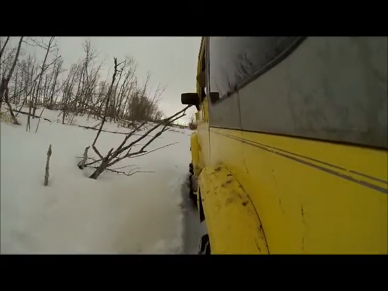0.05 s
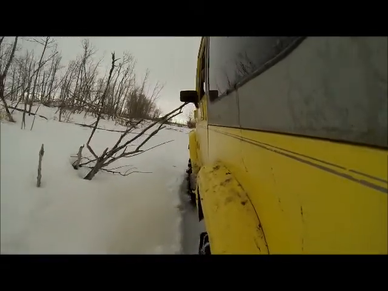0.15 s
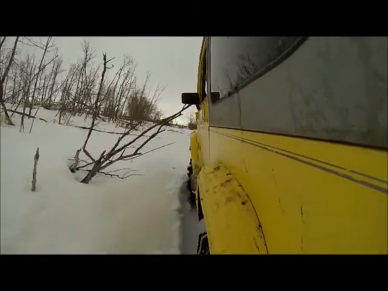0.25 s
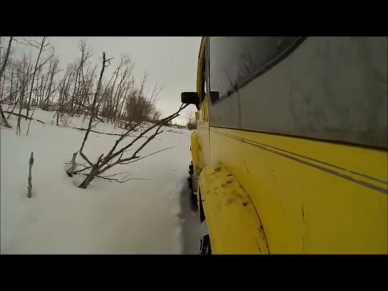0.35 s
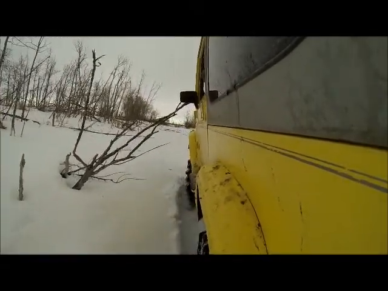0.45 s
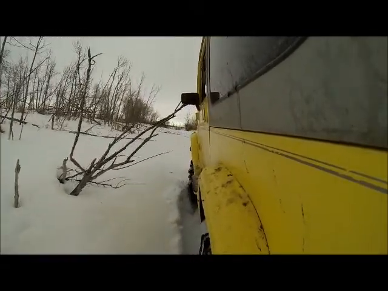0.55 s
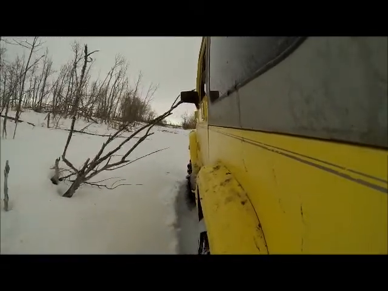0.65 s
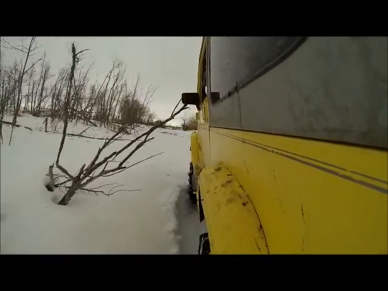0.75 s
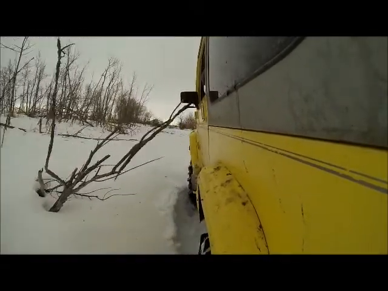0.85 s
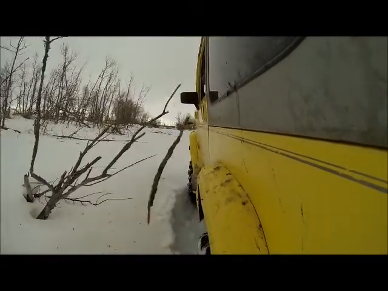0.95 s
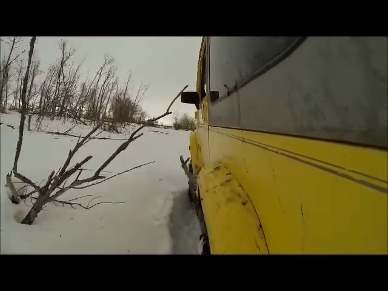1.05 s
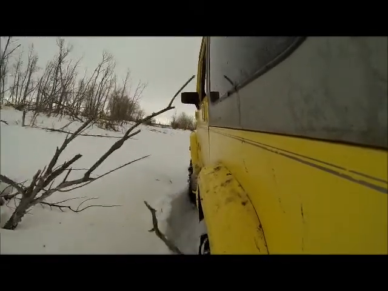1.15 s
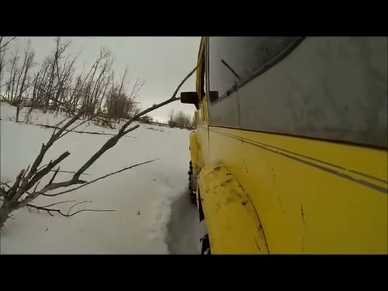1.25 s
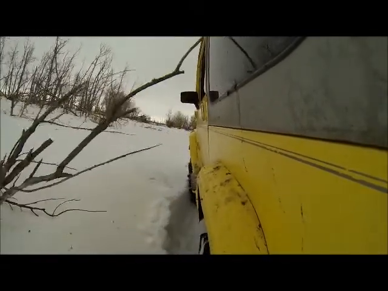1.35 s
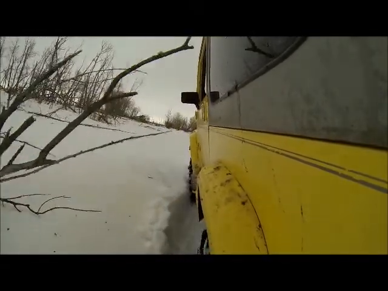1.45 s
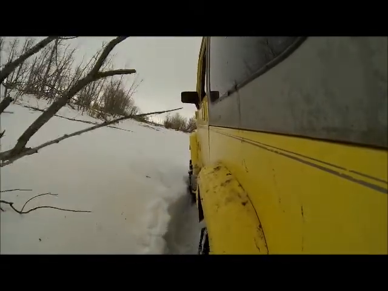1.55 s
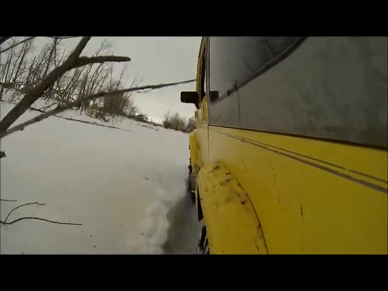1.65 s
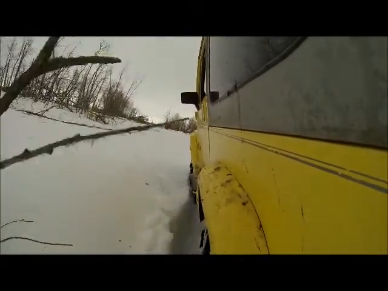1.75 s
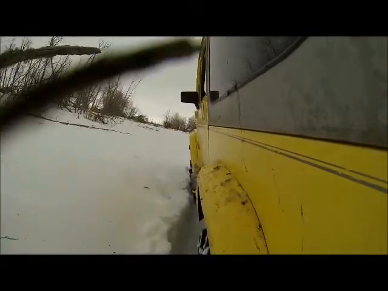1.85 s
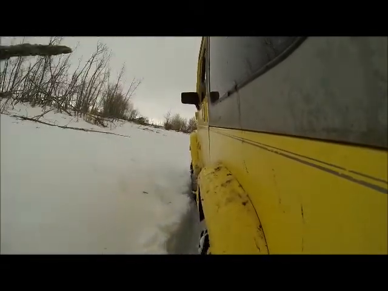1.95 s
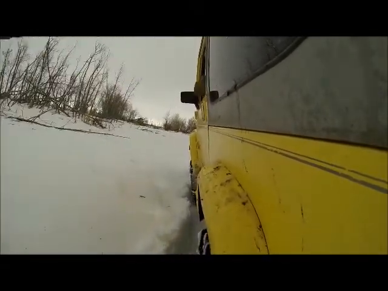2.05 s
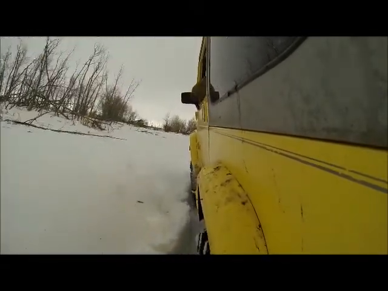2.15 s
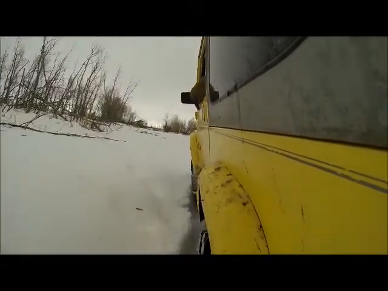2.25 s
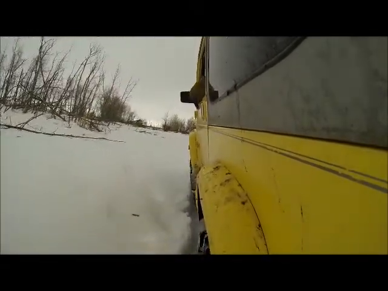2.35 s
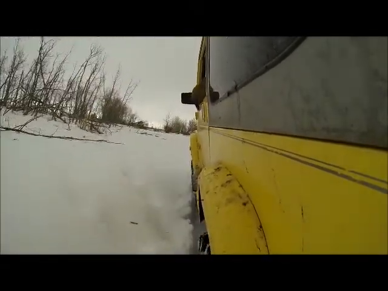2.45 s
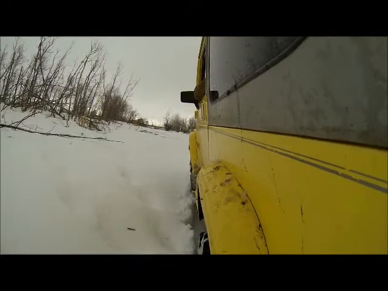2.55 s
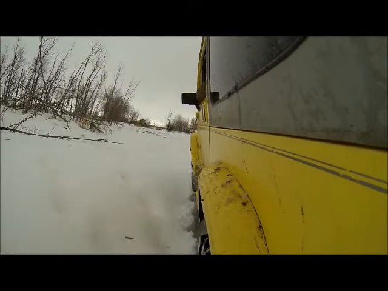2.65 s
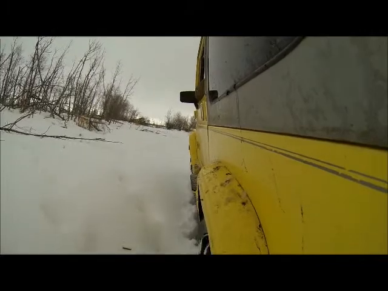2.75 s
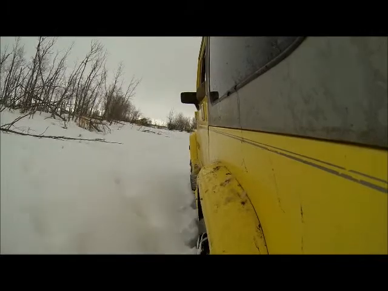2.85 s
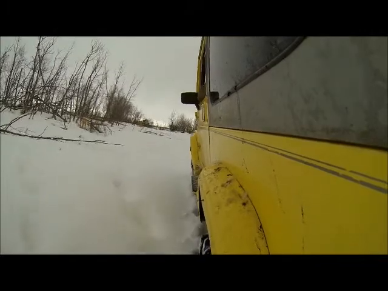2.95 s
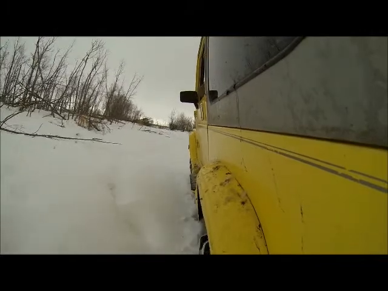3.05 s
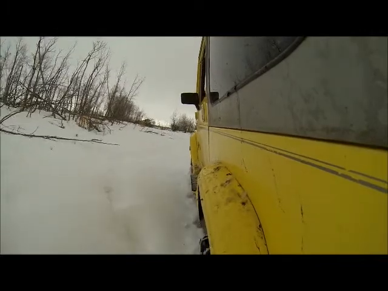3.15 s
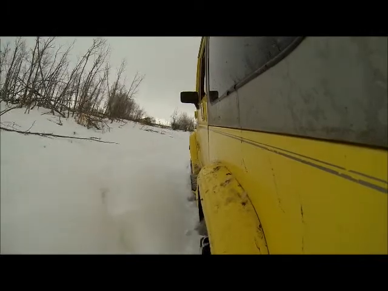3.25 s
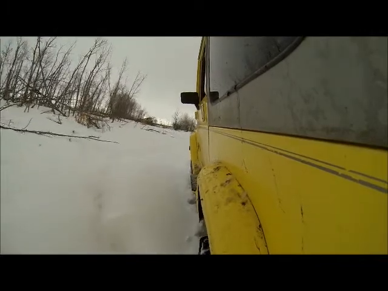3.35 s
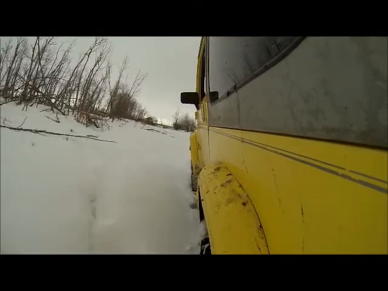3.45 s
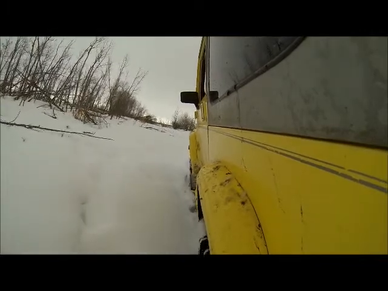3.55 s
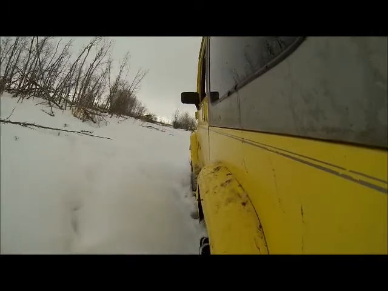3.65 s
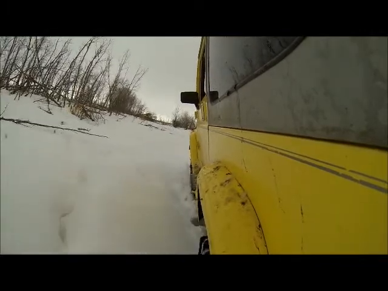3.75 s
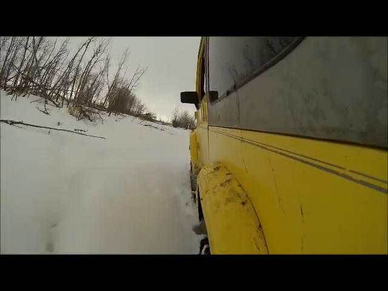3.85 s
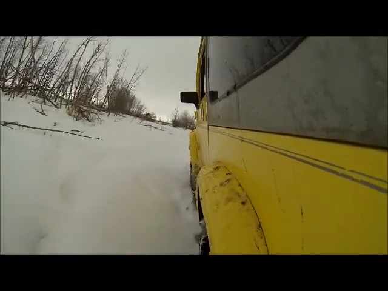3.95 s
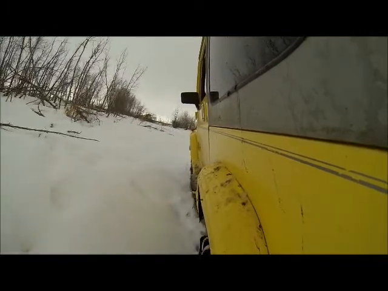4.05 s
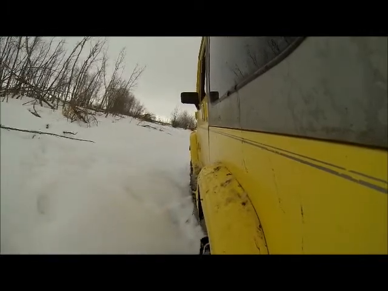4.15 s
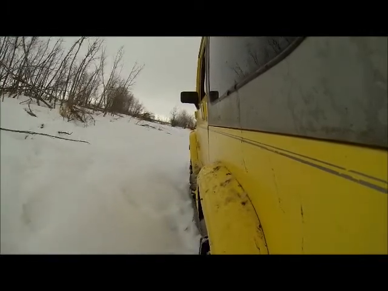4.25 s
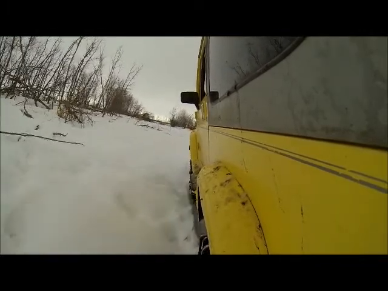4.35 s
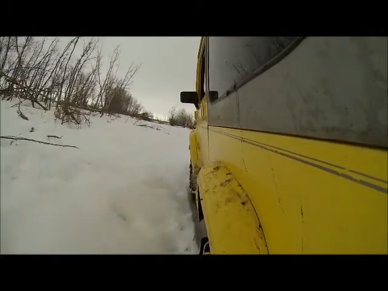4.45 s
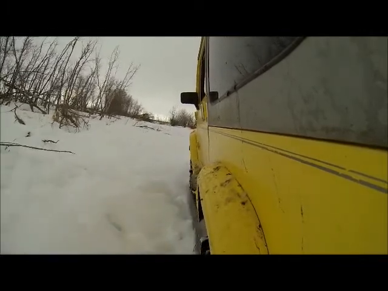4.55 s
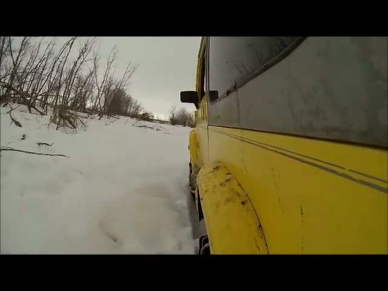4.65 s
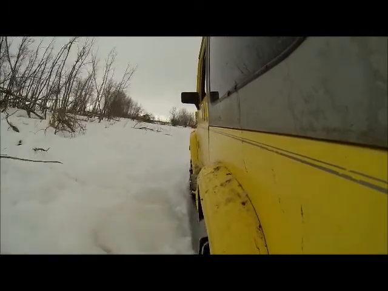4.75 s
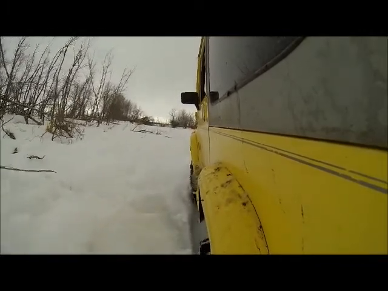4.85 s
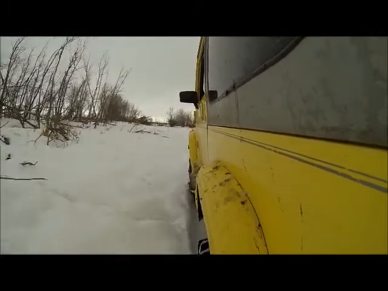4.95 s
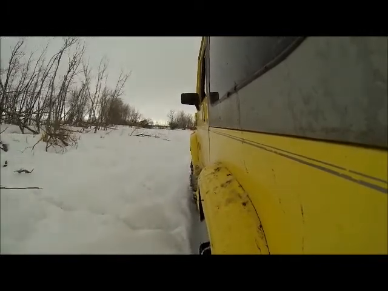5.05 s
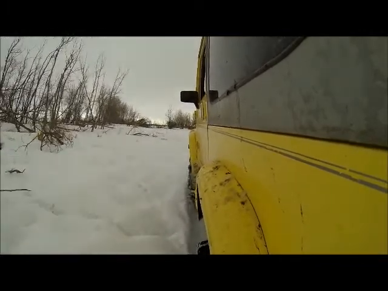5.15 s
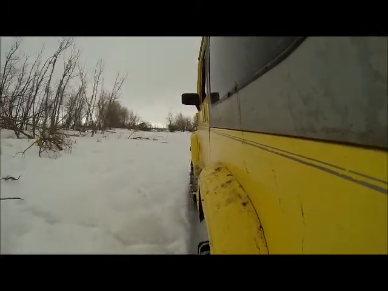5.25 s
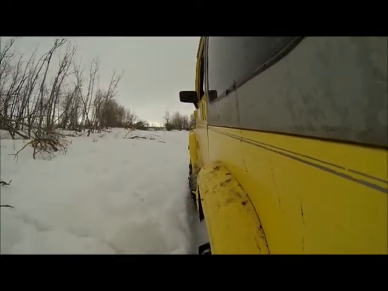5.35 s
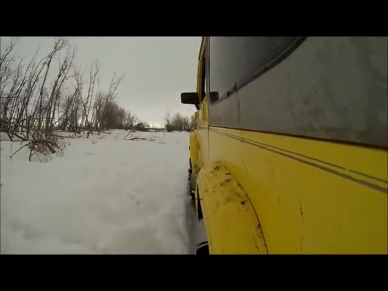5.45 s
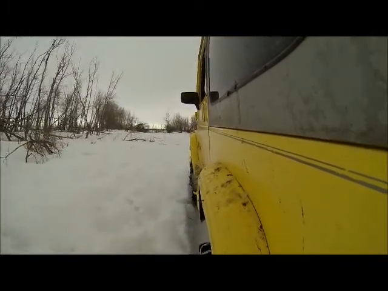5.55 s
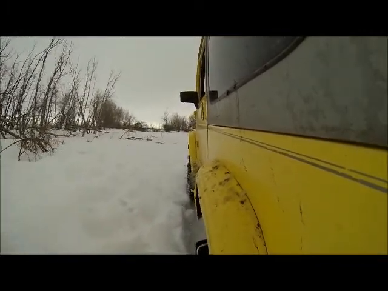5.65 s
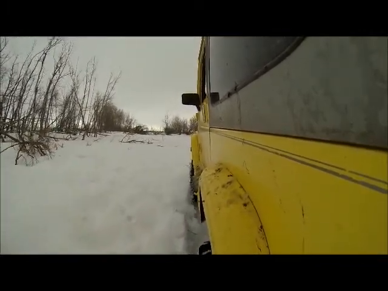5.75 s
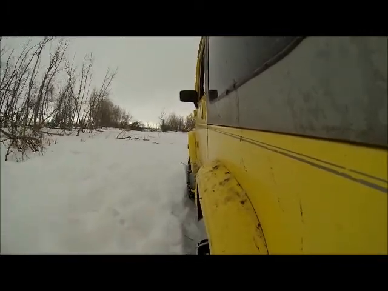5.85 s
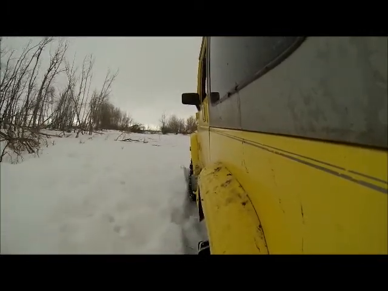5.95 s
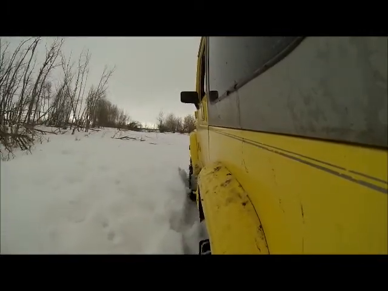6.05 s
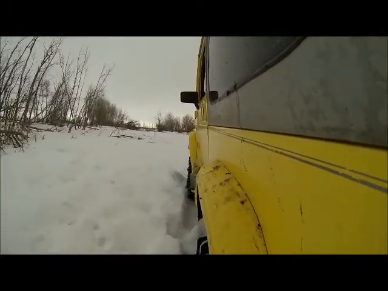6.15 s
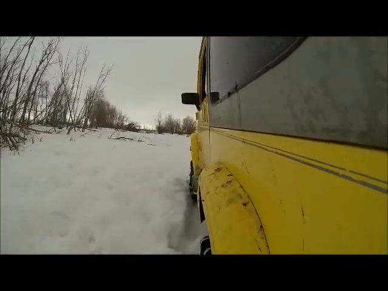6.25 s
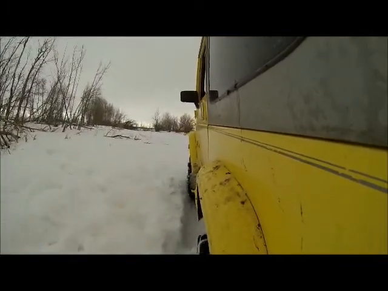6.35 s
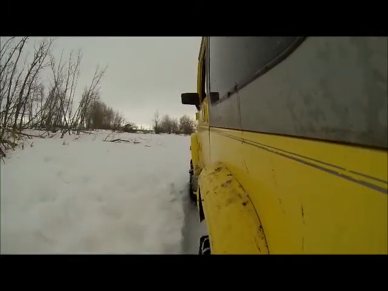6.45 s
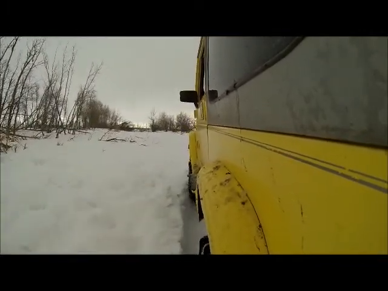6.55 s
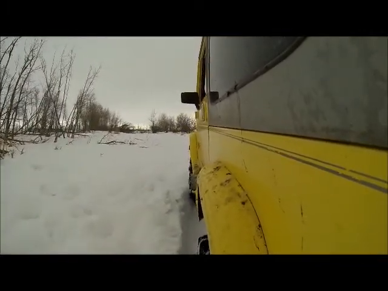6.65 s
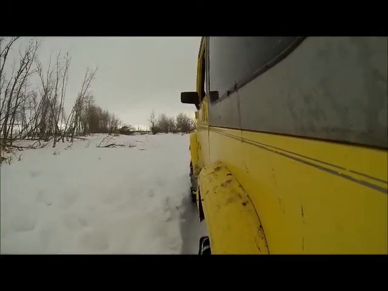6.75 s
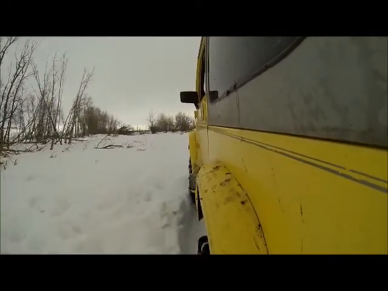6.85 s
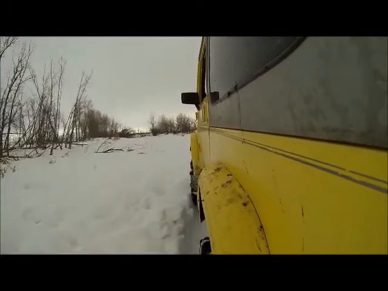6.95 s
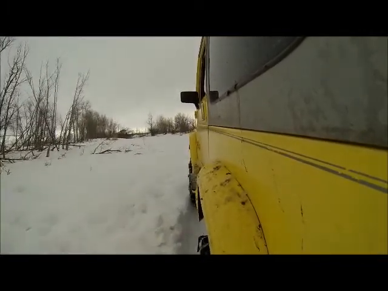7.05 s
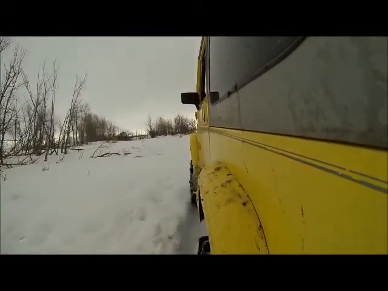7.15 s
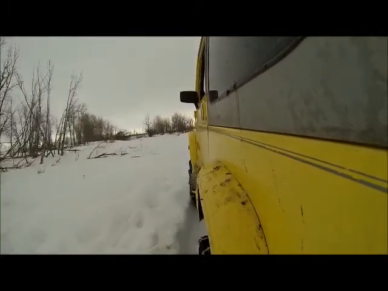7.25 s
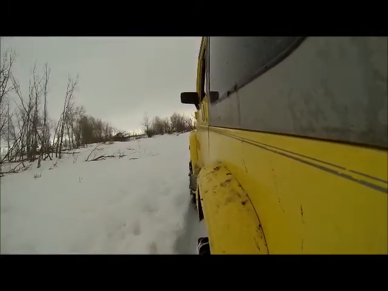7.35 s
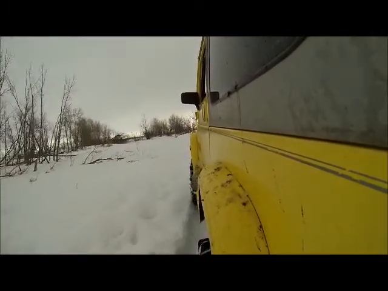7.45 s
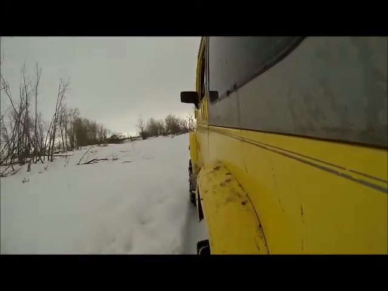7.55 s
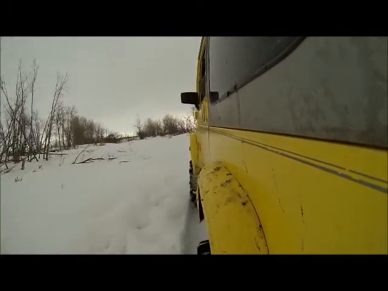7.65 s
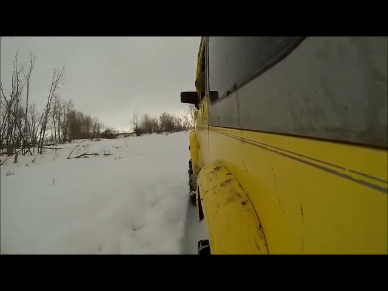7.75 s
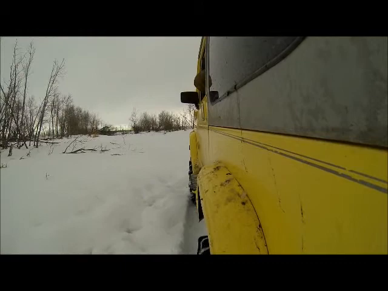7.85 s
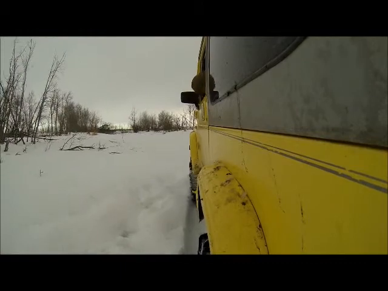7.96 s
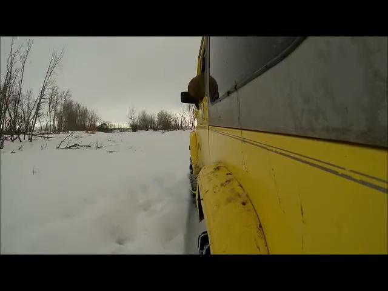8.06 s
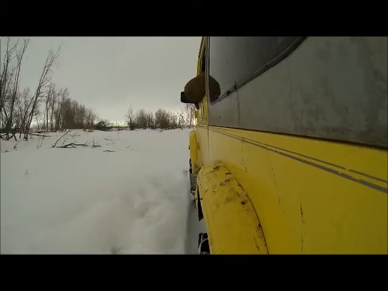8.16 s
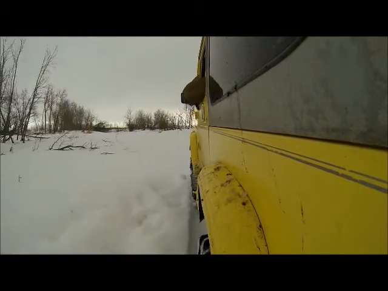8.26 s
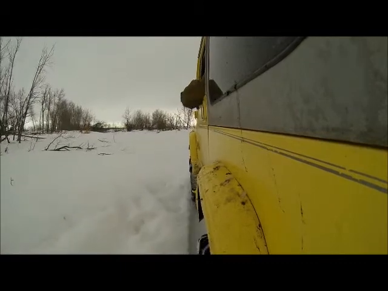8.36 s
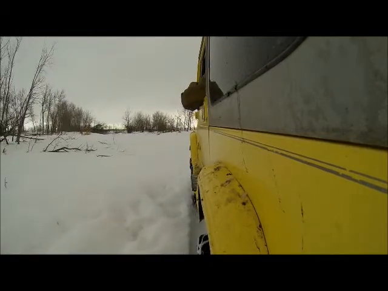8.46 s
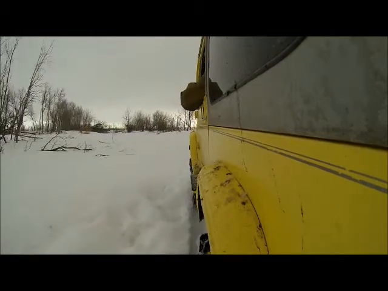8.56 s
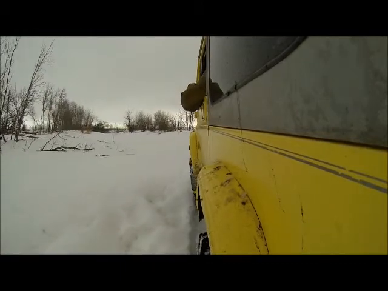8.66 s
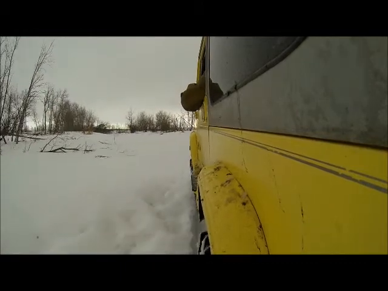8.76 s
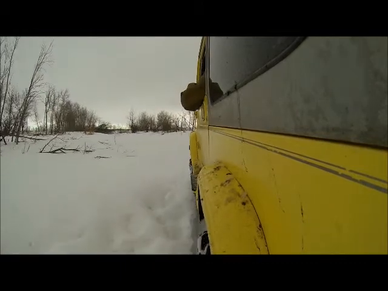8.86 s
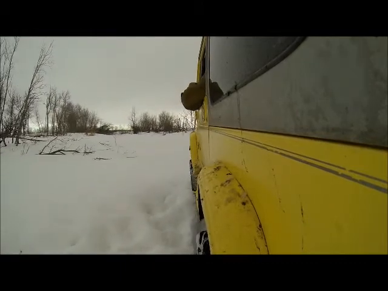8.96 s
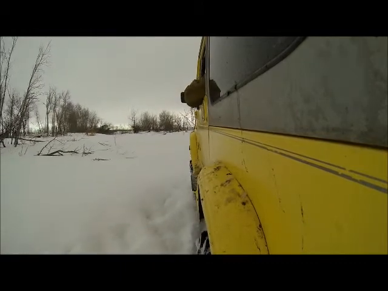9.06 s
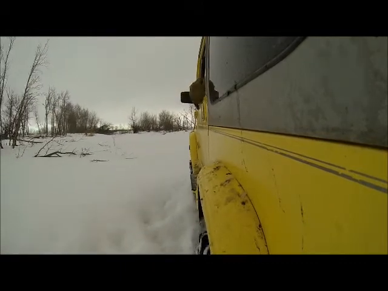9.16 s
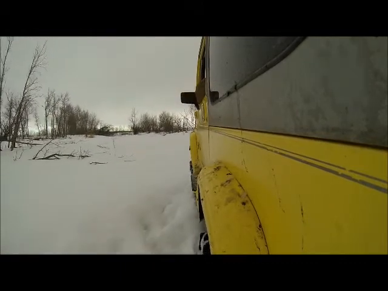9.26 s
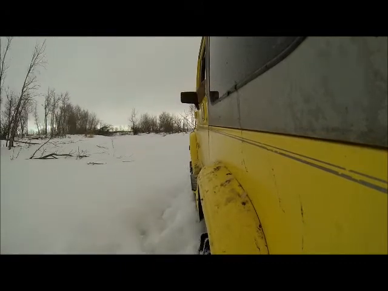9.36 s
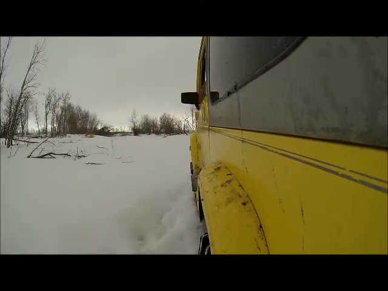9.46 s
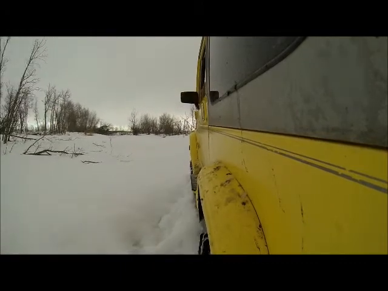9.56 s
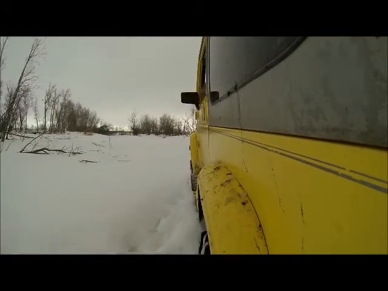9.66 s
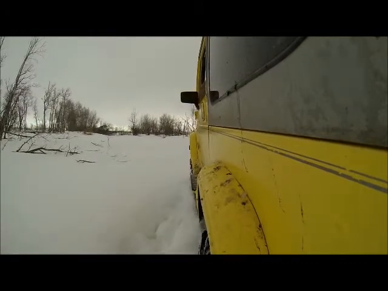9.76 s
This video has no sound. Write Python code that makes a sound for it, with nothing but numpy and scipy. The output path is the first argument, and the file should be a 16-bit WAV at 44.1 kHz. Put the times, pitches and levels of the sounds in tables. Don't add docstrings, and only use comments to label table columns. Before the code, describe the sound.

Very close, slightly muffled mono sound of an off-road vehicle in snow outdoors: low exhaust thumps, droning panels, rattling fittings and faint gear whine. A rough, faltering start is broken by loud dry branch blows and scraping bark. The engine then rises and pulls steadily, rumbling over ruts. Near the end it dips, misfires and recovers, with scattered twig knocks and thin hiss from thrown snow.

```python
import sys
import numpy as np
from scipy import signal
from scipy.fft import rfft, irfft, next_fast_len
from scipy.io import wavfile
from scipy.ndimage import uniform_filter1d

SR = 44100
rng = np.random.default_rng(int(sys.argv[2]) if len(sys.argv) > 2 else 0)


def attenuation_scalar(level_db):
    decades = np.asarray(level_db, float) / 20
    return 10 ** decades


def log_audio(samples):
    frames = np.atleast_2d(samples).T
    limited = np.clip(frames, -1, 1)
    pcm = np.round(limited * 32767).astype(np.int16)
    wavfile.write(sys.argv[1], SR, pcm)


N = 433062

# (time [s], firing rate [Hz])
ENGINE_SPEED = [(0.5, 29.65), (0.87, 53.08), (1.07, 48.15), (1.4, 56.3), (1.63, 52.43), (3.35, 68.9),
                (3.98, 66.27), (4.27, 61.15), (4.72, 63.23), (5.07, 58), (6.2, 71.18), (6.72, 62.65),
                (7.4, 64.6), (8.12, 69.2), (8.6, 55.03), (8.92, 60.53), (9.58, 62.43), (9.8, 69.5)]
# (time [s], change of firing rate [Hz], half length [s])
SPEED_BENDS = [(0.736, 2.5, 0.092), (1.401, .5, .14), (1.939, -0.88, 0.18), (2.302, .5, 0.09),
               (2.419, -1.5, 0.29), (2.497, 0, 0.077), (3.918, -0.44, .3), (4.885, -1.62, .1),
               (5.322, 0.99, .07), (5.659, -1.4, .18), (6.242, .5, .2), (6.596, -1.02, .07),
               (6.944, -0.67, .13), (7.697, -0.91, 0.13), (8.301, -1.25, .06), (8.446, -2.5, 0.29),
               (8.462, 1.33, 0.051), (8.779, -0.7, 0.077), (8.946, 0.2, 0.051), (9.062, -0.7, 0.049),
               (9.346, 2.1, .1), (9.56, 0, .05)]
# (time [s], firing strength [dB], panel ring [dB])
THROTTLE = [(0, -3, -3.5), (.5, -3, -10), (.7, 1, -3), (.95, -7.5, -11), (1.3, -9.5, -13.5), (1.75, -2, -9),
            (2.0, -1.5, -4.5), (2.2, -6, -12), (3.1, -0.1, -2.5), (3.7, 0.5, -3), (4.9, -1, -6.5),
            (5.6, -1.1, -3.5), (5.98, 0.8, -2), (7.0, -1, -2.5), (8.15, 0, 0.5), (8.19, -2.5, -4.5),
            (8.7, -3.5, -7), (9.82, -2, -4.5)]
# (time [s], strength [dB])
STALL_FIRINGS = [
    (.008, -2),
    (0.031, 1.5),
    (0.059, 2),
    (.079, -9),
    (0.142, -5),
    (0.172, 3.5),
    (.192, -14),
    (0.234, 1.5),
]
# (time [s], loss [dB])
WEAK_FIRINGS = [(1.476, -9), (3.916, -10), (4.066, -6.5), (4.192, -4.5), (4.773, -5), (4.801, -30),
                (4.974, -5.5), (6.365, -14), (6.516, -7), (6.577, -9), (6.921, -24), (7.685, -4.5),
                (7.704, -7), (8.158, 0), (8.202, -5.5), (8.23, -14.5), (8.283, -0.5), (8.486, -3),
                (8.502, -12), (8.542, -16.5), (8.997, -8.5), (9.044, -9), (9.208, -15.5), (9.289, -1.5),
                (9.321, -10.5), (9.417, -2.5), (9.562, -4)]
# (pitch [Hz], width [Hz], level [dB])
EXHAUST_CHAMBERS = [(50.26, 35.2, -1.5), (104, 62.7, -6)]
# (frequency [Hz], level [dB])
PANEL_RESPONSE = [(165, -50), (180, -39), (192, -32), (208, -41), (235, -41), (262, -35.5), (290, -31),
                  (318, -27.5), (338, -32), (355, -33), (385, -39.5), (435, -48), (505, -42), (570, -44),
                  (615, -52), (655, -27.5), (690, -33.5), (725, -29), (760, -33), (815, -34), (870, -44),
                  (915, -42), (980, -53), (1200, -60)]
# (time [s], level [dB])
LOOSE_PLATE = [(0, 1.5), (1.9, -3), (2.6, -15), (3.5, 2.5), (4.3, -6.5), (5.3, 6), (6.1, 9.5), (6.7, 5.5),
               (8.1, 7.5), (8.5, 7.5), (9.82, -6.5)]
# (time [s], level [dB])
ORDER_HUM = [(0, -32), (2.2, -15.5), (2.9, -5), (3.5, -7), (4.5, -2), (5.6, 3), (6.1, -1.5), (7.3, 1),
             (8.1, 0.5), (8.5, -8.5), (8.9, -9), (9.5, -3), (9.82, -2.5)]
# (time [s], level [dB])
GEAR_WHINE = [(0, -6), (2.2, -3), (2.5, 2), (2.8, 0), (4.7, -3), (4.9, 4), (5.2, -2), (5.45, 4), (8.1, 3),
              (8.25, 7), (8.42, 2), (8.6, -6), (8.88, -8), (9.0, 2), (9.2, 0), (9.82, 0)]
# (time [s], rumble [dB])
RUTS = [(.11, -30), (.22, -23), (.9, -22), (1.15, -18), (1.55, -16), (3.55, -23.5), (3.9, -21.5),
        (4.4, -24.5), (4.95, -16.5), (5.22, -17), (5.5, -32), (5.75, -15), (6.021, -30), (6.38, -18.5),
        (6.929, -25.5), (7.251, -27), (7.6, -30.5), (7.85, -31), (8.15, -18.5), (8.36, -17), (8.55, -15),
        (8.8, -13.5), (8.99, -22), (9.19, -16.5), (9.35, -27), (9.52, -19)]
# (frequency [Hz], level [dB per Hz])
ROAR_COLOUR = [(90, -12), (200, -8), (330, -7), (385, -10), (435, -14.5), (500, -11.5), (615, -14),
               (655, -2), (720, -9.5), (770, -7.5), (860, -15.5), (920, -13), (980, -17.5), (1350, -29.5)]
# (frequency [Hz], level [dB per Hz])
RATTLE_COLOUR = [(710, -22.5), (1200, -2.5), (1520, -4), (1680, 0), (1980, -3), (2400, -9.5), (2800, -6.5),
                 (3390, -10), (3830, -17), (4550, -24.5), (5230, -20.5), (6490, -31), (8560, -28.5),
                 (9500, -36), (12400, -65), (20900, -120)]
# (frequency [Hz], level [dB per Hz])
SPRAY_COLOUR = [(7000, -21), (8500, -5), (9600, -7.5), (10800, -2.5), (12000, -11.5), (14000, -8.5),
                (15700, -10.5)]
# (time [s], level [dB])
THROWN_SNOW = [(0, 1), (2.2, -1.5), (2.62, -3), (2.78, 2), (2.95, -3.5), (3.5, -2), (3.8, 3.5), (4.7, 1),
               (5.2, 1), (6.0, -3), (6.5, -4), (7.0, 1), (7.6, 2.5), (8.0, -3), (8.3, -0.5), (9.1, -6),
               (9.6, 0.5), (9.82, -3)]
# (time [s], peak [dB])
ICE_CRUMBS = [(0.0337, -50.5), (0.102, -47.5), (0.1221, -49.5), (0.1781, -45), (0.2279, -48.5),
              (0.243, -47.5), (0.516, -44), (0.6841, -48), (1.308, -54.5), (1.486, -57), (1.5257, -58.5),
              (1.8309, -53.5), (1.9268, -49), (2.3234, -59), (2.6429, -54.5), (2.7342, -52),
              (8.2178, -54.5), (8.2666, -54), (8.4023, -60.5), (8.4432, -55.5), (8.5283, -52),
              (8.8395, -55), (9.094, -61), (9.2366, -59.5), (9.2768, -48.5), (9.548, -49), (9.615, -56)]
# (time [s], peak [dB], ring [Hz], fade by 60 dB [s], snap [dB])
WOOD_BLOWS = [(0.1486, -33.5, 1500, 0.06, -29.5), (0.2687, -0.5, 3300, 0.023, -17.5),
              (0.2762, -7, 3930, 0.02, -18), (0.2811, -14, 5250, 0.014, -18.5),
              (0.2846, -13.5, 3510, 0.065, -19), (0.3085, -8, 2800, 0.02, -10),
              (.349, -36.5, 1900, .025, -39), (0.516, -25, 3200, 0.045, -23),
              (.6833, -33, 1700, 0.013, -15), (0.7692, -12, 2335, 0.07, -18.5),
              (0.845, -18, 1900, 0.09, -42), (1.1191, -17.5, 1675, 0.055, -36),
              (1.153, -14, 1770, 0.035, -38), (1.1608, -8.5, 2110, 0.05, -27),
              (1.1936, -20, 2390, 0.08, -32.5), (1.268, -23, 1900, 0.069, -33),
              (1.444, -21, 2210, 0.034, -39), (1.5359, -29.5, 2480, 0.094, -25.5),
              (1.9225, -18.5, 2230, 0.05, -39.5), (1.934, -26.5, 2070, 0.028, -40),
              (1.9872, -18.5, 2380, 0.06, -42), (2, -27.5, 2170, 0.035, -41),
              (2.0183, -18.5, 2240, 0.034, -18), (2.0401, -4.5, 3120, 0.016, -16),
              (2.0673, -8, 3780, 0.024, -23), (2.0786, -11, 3000, 0.044, -24.5),
              (2.0857, -12, 1400, 0.047, -40), (2.104, -29.5, 2580, .02, -37),
              (2.1149, -18, 2205, .025, -26), (2.121, -18.5, 2570, 0.026, -28.5),
              (2.1278, -9.5, 2810, 0.027, -28), (2.1347, -10, 1900, 0.039, -24),
              (2.1401, -12.5, 2920, 0.034, -28.5), (2.145, -19, 1900, 0.057, -24),
              (6.881, -14.5, 2324, 0.054, -22),
    (6.8856, -22, 1800, 0.031, -31.5),
    (6.9771, -17, 2630, 0.049, -25.5),
    (6.985, -19, 2310, 0.037, -25),
    (7.9524, -19.5, 1600, 0.09, -38),
    (9.552, -28.5, 2600, 0.08, -30),
    (9.7406, -21.5, 2180, 0.0592, -42),
]
# (time [s], peak [dB], ring [Hz])
TWIG_TIPS = [(.0882, -37, 3600), (.1226, -37, 3600), (.179, -33, 3900), (.2279, -39, 3600),
             (.4431, -33, 2600), (.477, -33, 2000), (.5718, -33, 2200), (.7209, -33, 2600),
             (1.323, -35, 4000), (1.363, -34, 3100), (1.713, -31, 2400), (1.768, -32, 2000),
             (1.824, -27, 2200), (1.878, -31, 2000), (2.463, -35, 3000), (2.497, -36, 3500),
             (2.54, -35, 4000), (2.595, -36, 3200), (2.643, -34, 3400), (5.467, -30, 2400),
             (5.485, -29, 2600), (5.5175, -27, 2600), (5.586, -28, 2800)]
# (time [s], level [dB], pitch [Hz], fade by 60 dB [s])
PANEL_KNOCKS = [(.2700, -15, 735, 0.056), (.2695, -19.5, 1600, .045), (1.272, -24, 560, .05),
                (0.771, -8, 1797, 0.01), (.7750, -34, 1700, 0.038), (1.127, -10, 288, 0.089),
                (1.14, -9.5, 680, 0.049), (1.123, -22, 1690, 0.055), (1.14, -14.5, 185.6, 0.14),
                (1.1630, -5.5, 827, 0.05), (1.16, -13.5, 2100, 0.022), (1.2698, -16, 1605, 0.044),
                (1.6, -24.5, 1996, 0.053), (1.445, -21.5, 2640, 0.029), (1.926, -21, 840, 0.045),
                (1.9, -18.5, 261, 0.083), (2.0860, -16.5, 750, 0.039), (2.1370, -11.5, 588, 0.032),
                (6.83, -27, 3000, 0.036), (6.884, -14, 189, 0.062), (6.883, -25, 1650, .04),
                (7, -25.5, 1900, .04), (6.9900, -20, 780, 0.12), (9.525, -16.5, 152.5, 0.093),
                (1.1208, -24, 940, 0.022), (1.17, -10, 840, 0.024), (1.195, -12, 673, 0.019),
                (2.137, -15.5, 1815, 0.058)]
# (time [s], level [dB], pitch [Hz], fade by 60 dB [s])
FITTING_PINGS = [(.009, -40, 3400, .06), (.058, -39, 3300, .05), (.071, -43, 3150, .04),
                 (.177, -39, 3250, .05), (.222, -39, 1850, .04), (.238, -42, 3150, .04),
                 (.369, -41, 3300, .04), (.403, -39, 3250, .05), (.599, -33, 2050, .07),
                 (.6725, -38, 3180, .08), (.70, -40, 3300, .04), (.741, -37, 1890, .06),
                 (5.4865, -29, 1750, .03), (5.564, -39, 3100, .06), (5.576, -36, 1900, .06)]
# (time [s], peak [dB])
DOOR_BUMPS = [(0.146, -21), (0.369, -28), (0.718, -18), (3.559, -22), (4.72, -26), (6.867, -19),
              (7.154, -22), (7.245, -23), (7.306, -22), (7.567, -20.5), (8.178, -23), (9.362, -31)]
# (start [s], length [s], level [dB], brightness [dB])
TWIG_DRAGS = [(0.268, 0.115, -33, 10), (0.778, 0.051, -42.5, 10.5), (0.825, 0.037, -33, -25),
              (1.154, 0.075, -45.5, 2.5), (1.304, 0.086, -43, 1), (1.537, 0.22, -44, -20),
              (2.074, 0.0295, -32, -8.5), (2.114, 0.05, -23.5, -8.5), (1.165, 0.019, -22.5, -7),
              (6.987, 0.078, -39.5, 2), (0.624, 0.067, -49.5, -7), (2.709, 0.18, -46.5, 9),
              (5.436, 0.28, -53, -15)]
# (pitch [Hz], width [Hz], level [dB])
PAINTED_METAL = [(680, 770, 7.5), (1860, 190, 1.5), (3000, 560, 0.5), (5100, 360, -36)]

FIRST_STEADY_S = .269
SMOOTH_HZ = 56
LUGGING_HZ = 47.77
DOOR_HZ, DOOR_DB, DOOR_T60_S = 694, -34, 0.061


def curves(table):
    s, *columns = np.transpose(table)
    return [np.interp(np.arange(N) / SR, s, c) for c in columns]


def bumps_in_time(events):
    t = np.arange(0, N, 64) / SR
    swell = sum(height * np.exp(-((t - s) / half_s) ** 2) for s, height, half_s in events)
    return np.interp(np.arange(N) / SR, t, swell)


def unit(x):
    return x / np.sqrt(np.mean(x ** 2))


def band(x, lo_hz, hi_hz, order=2):
    return signal.sosfilt(signal.butter(order, [lo_hz, hi_hz], "band", fs=SR, output="sos"), x)


def ring(x, hz, width_hz):
    r, w = np.exp(-np.pi * width_hz / SR), 2 * np.pi * hz / SR
    return signal.lfilter([np.sin(w)], [1, -2 * r * np.cos(w), r * r], x)


def walk(rate):
    place = np.arange(N) * rate / SR
    levels = rng.standard_normal(N // 40)[:int(place[-1]) + 2]
    return 1.2 * np.interp(place, np.arange(len(levels)), levels)


def coloured(x, shape, flicker_db):
    hz, db = np.transpose(shape)
    size = next_fast_len(N)
    octave = np.log2(np.arange(1, size // 2 + 2) * SR / size)
    gain = attenuation_scalar(np.interp(octave, np.log2(hz), db, left=-90, right=-90))
    spectrum = rfft(x, size) * gain
    centres = np.arange(np.log2(hz[0]), min(np.log2(hz[-1]), np.log2(SR / 3)) + .5, .5)
    out = np.zeros(N)
    for centre in centres:
        part = irfft(spectrum * np.clip(1 - 2 * abs(octave - centre), 0, 1), size)[:N]
        out += part * attenuation_scalar(flicker_db * walk(18))
    return unit(out)


def revs():
    return curves(ENGINE_SPEED)[0] + bumps_in_time(SPEED_BENDS)


def firings():
    turns = np.cumsum(revs()) / SR
    turns -= turns[int(FIRST_STEADY_S * SR)]
    at = np.flatnonzero((np.diff(np.floor(turns)) > 0) & (turns[1:] >= 0))
    db = 1.17 * rng.standard_normal(N // 400)[:len(at)]
    for s, loss_db in WEAK_FIRINGS:
        db[np.argmin(abs(at / SR + .007 - s))] += 0.98 * loss_db
    clicks = np.zeros(N)
    clicks[at] = attenuation_scalar(db)
    for s, stall_db in STALL_FIRINGS:
        clicks[int(s * SR)] = attenuation_scalar(stall_db)
    return clicks, turns


def vigour(clicks):
    return uniform_filter1d(uniform_filter1d(clicks, size=1400), size=1000) * SR / revs()


def lugging_strokes(clicks):
    return np.flatnonzero((clicks > 0) & (curves(ENGINE_SPEED)[0] < LUGGING_HZ)) / SR


def exhaust(clicks):
    pushes = clicks * attenuation_scalar(curves(THROTTLE)[0])
    boom = sum(attenuation_scalar(db) * ring(pushes, hz, width) for hz, width, db in EXHAUST_CHAMBERS)
    tailpipe = signal.butter(3, 90, fs=SR, output="sos")
    return attenuation_scalar(3) * band(signal.sosfilt(tailpipe, boom), 22, 1700, order=1)


def panels(turns, even):
    hz = np.gradient(turns) * SR
    panel_db = curves(THROTTLE)[1]
    strength = np.minimum(even, 1.3) * attenuation_scalar(panel_db - 0.5) * np.minimum(hz / SMOOTH_HZ, 1) ** 0.79
    panel_hz, through_db = np.transpose(PANEL_RESPONSE)
    plate_db, = curves(LOOSE_PLATE)
    crank = .14 * np.cos(2 * np.pi * turns / 3)
    upper = np.zeros(N)
    for k in range(3, 15):
        db = np.interp(np.log(k * hz[::8]), np.log(panel_hz), through_db, left=-90) + .6 * walk(6)[::8]
        if k == 3:
            db = db + plate_db[::8]
        level = np.repeat(attenuation_scalar(db), repeats=8)[:N]
        upper += level * np.sin(2 * np.pi * (k * turns + (k > 8) * crank + rng.random()))
    return strength * upper


def order_hum(turns):
    level = attenuation_scalar(-35.5 + curves(ORDER_HUM)[0] + 1.5 * walk(3))
    return level * np.sin(2 * np.pi * 3.34 * turns + .3 * walk(4))


def gears(turns):
    teeth = 17.35
    hz = np.gradient(turns) * SR
    case = 0.17 + 1 / (1 + ((teeth * hz - 1030) / 22) ** 2)
    level = attenuation_scalar(-45.5 + curves(GEAR_WHINE)[0] + 1.5 * walk(7))
    return level * case * np.sin(2 * np.pi * teeth * turns)


def rumble():
    gain = attenuation_scalar(-33.5) + bumps_in_time([(s, attenuation_scalar(db), 0.1) for s, db in RUTS])
    return unit(band(rng.standard_normal(N), 18, 70)) * gain * attenuation_scalar(-5.0 + 0.57 * walk(15))


def effort_level(db, per_panel_db, db_per_octave):
    octaves = np.log2(curves(ENGINE_SPEED)[0] / 65)
    return db + per_panel_db * curves(THROTTLE)[1] + db_per_octave * octaves


def throb(turns):
    return np.cos(2 * np.pi * (turns - .2))


def roar(turns, even):
    noise = coloured(rng.standard_normal(N) * attenuation_scalar(.9 * throb(turns)), ROAR_COLOUR, flicker_db=.5)
    level_db = effort_level(-30, 0.28, 0.23) - 1.5 + 0.16 * curves(LOOSE_PLATE)[0]
    return noise * np.clip(even, .3, 1.1) ** 0.53 * attenuation_scalar(level_db)


def rattle(turns):
    grains = rng.standard_normal(N) * attenuation_scalar(1.2 * throb(turns) + 1.6 * walk(150) + walk(25))
    return coloured(grains, RATTLE_COLOUR, flicker_db=0.5) * attenuation_scalar(effort_level(-44, 0.62, -0.87))


def spray():
    gusts = attenuation_scalar(2 * walk(60) + .6 * walk(2.4) + curves(THROWN_SNOW)[0])
    hiss = coloured(rng.standard_normal(N) * gusts, SPRAY_COLOUR, flicker_db=2.0)
    return hiss * attenuation_scalar(effort_level(-70.5, 0.34, -1.2))


def belly():
    slow = np.clip(1.15 - revs() / SMOOTH_HZ, 0, .35) / .35
    return attenuation_scalar(-35.5 + 1.5 * walk(20)) * slow * unit(band(rng.standard_normal(N), 128, 290))


def ringing_metal(clicks):
    out, t = np.zeros(N + 4096), np.arange(4096) / SR
    strokes = [(s + 0.0022, DOOR_DB + 2 * rng.standard_normal(), DOOR_HZ, DOOR_T60_S)
               for s in lugging_strokes(clicks)]
    bumps = [(s, db - 4.5, DOOR_HZ, DOOR_T60_S) for s, db in DOOR_BUMPS]
    for s, db, hz, t60 in PANEL_KNOCKS + FITTING_PINGS + strokes + bumps:
        wobble = (1 - np.exp(-t / .0007)) * (1 + 4 * band(rng.standard_normal(len(t)), 30, 250))
        out[int(s * SR):][:len(t)] += attenuation_scalar(db - 60 * t / t60) * np.sin(2 * np.pi * hz * t) * wobble
    return out[:N]


def twigs(clicks):
    out, t = np.zeros(N + 4096), np.arange(4096) / SR
    ticks = [(s + 0.0032, -32.5 + 3.8 * rng.standard_normal(), 2000, 0.035, -40)
             for s in lugging_strokes(clicks)]
    tips = [(s, db, hz, 0.038, -28.5) for s, db, hz in TWIG_TIPS]
    for s, db, hz, t60, snap_db in WOOD_BLOWS + ticks + tips:
        fade = attenuation_scalar(-60 * t / np.clip(t60, .012, .08)) * (1 - np.exp(-t / 0.0001))
        unevenness = uniform_filter1d(rng.standard_normal(len(t)), size=40)
        ragged = attenuation_scalar(11 * unevenness * 2 * np.minimum(t / .004, 1))
        crack = rng.standard_normal(len(t)) * fade * ragged
        blow = band(crack, 1200, max(3800, 1.4 * hz), order=4) + .15 * ring(crack, hz, 400)
        thud_db = -22 * max(np.log2(hz / 1900), 0)
        blow += attenuation_scalar(thud_db) * 7.9 * band(crack, 400, 1800, order=4)
        snap = band(rng.standard_normal(len(t)) * ragged * fade ** 2.2, 4200, 9500)
        blow += attenuation_scalar(snap_db) * 3.5 * snap
        out[int(s * SR):][:len(t)] += attenuation_scalar(db) * blow / abs(blow).max() * 0.62
    return out[:N]


def crumbs():
    out, t = np.zeros(N + 1024), np.arange(1024) / SR
    for s, db in ICE_CRUMBS:
        peck = band(rng.standard_normal(len(t)) * attenuation_scalar(-60 * t / .018), 7600, 14500)
        out[int(s * SR):][:len(t)] += attenuation_scalar(db - 1) * peck / abs(peck).max()
    return out[:N]


def scrapes():
    grains = rng.standard_normal(N) * attenuation_scalar(4.5 * walk(700) + 2.2 * walk(160))
    dull = unit(sum(attenuation_scalar(db) * unit(ring(grains, hz, width)) for hz, width, db in PAINTED_METAL))
    dull = band(dull, 300, 5500, order=4)
    fine_grains = rng.standard_normal(N) * attenuation_scalar(1.5 * walk(500) + 1.2 * walk(120))
    bright = unit(band(fine_grains, 4300, 10500))
    bright = unit(bright + 0.55 * unit(ring(bright, 8700, 500)))
    out = np.zeros(N)
    for s, length, db, bright_db in TWIG_DRAGS:
        swell = np.sin(np.pi * np.linspace(0, 1, int(length * SR)) ** .45) ** .9
        part = slice(int(s * SR), int(s * SR) + len(swell))
        out[part] += attenuation_scalar(db) * swell * (dull[part] + attenuation_scalar(bright_db - 24.0) * bright[part])
    return out


def scene():
    clicks, turns = firings()
    even = vigour(clicks)
    engine = exhaust(clicks) + panels(turns, even) + order_hum(turns) + gears(turns)
    body = rumble() + roar(turns, even) + rattle(turns) + spray() + belly()
    side = ringing_metal(clicks) + twigs(clicks) + crumbs() + scrapes()
    return (engine + body + side)[None]


def roll_off(x):
    return signal.sosfilt(signal.butter(12, 15710, fs=SR, output="sos"), x)


def record(dry):
    mix = np.tanh(0.74 * dry) / 0.63
    return roll_off(mix)


dry = scene()
out = record(dry)
log_audio(out)
```